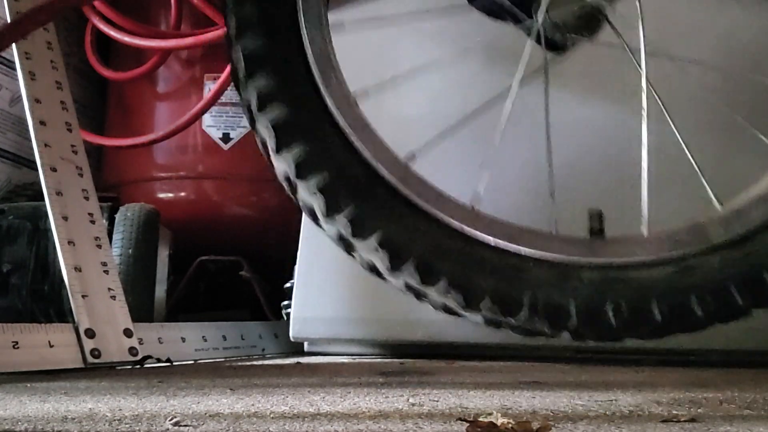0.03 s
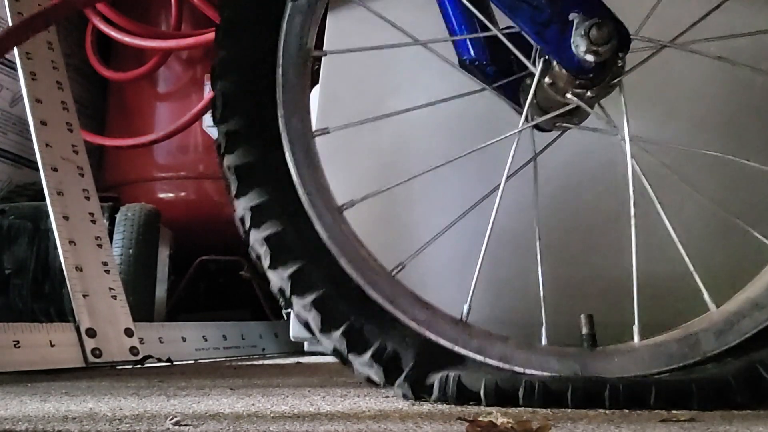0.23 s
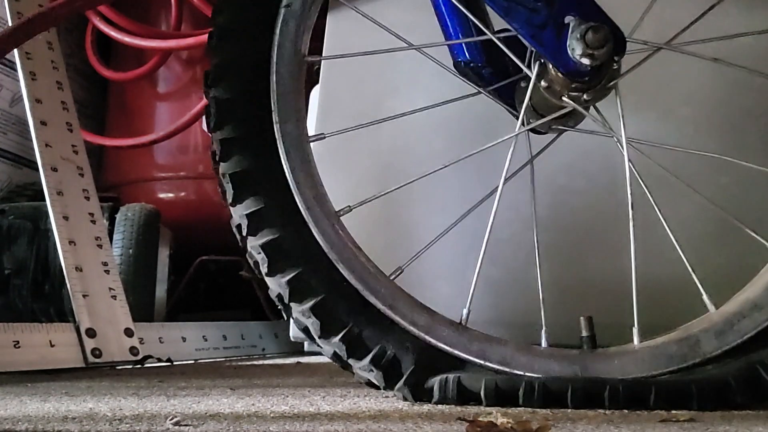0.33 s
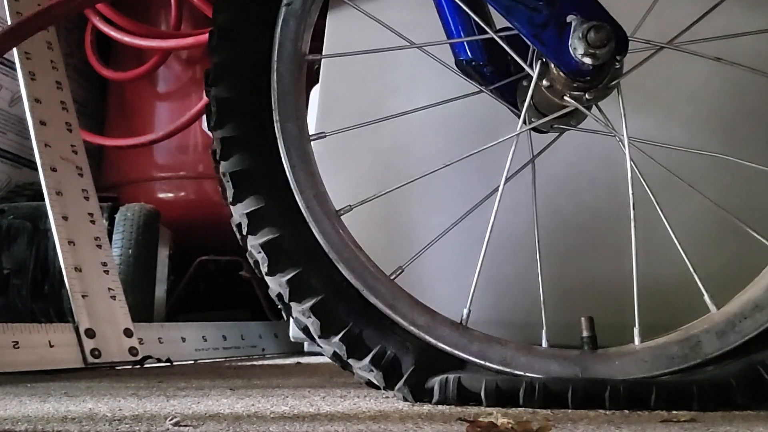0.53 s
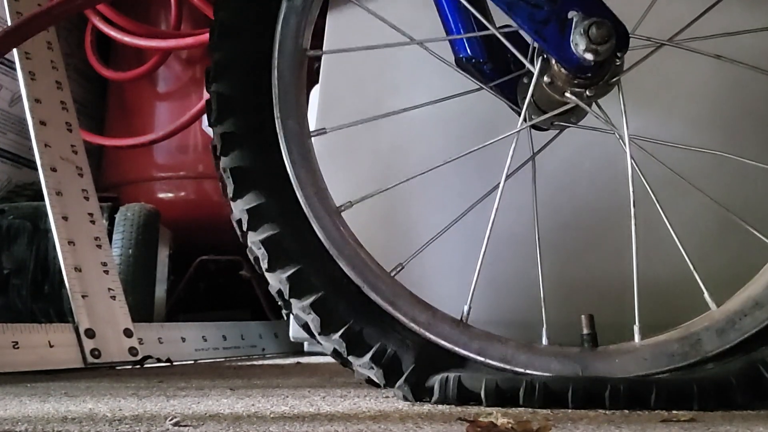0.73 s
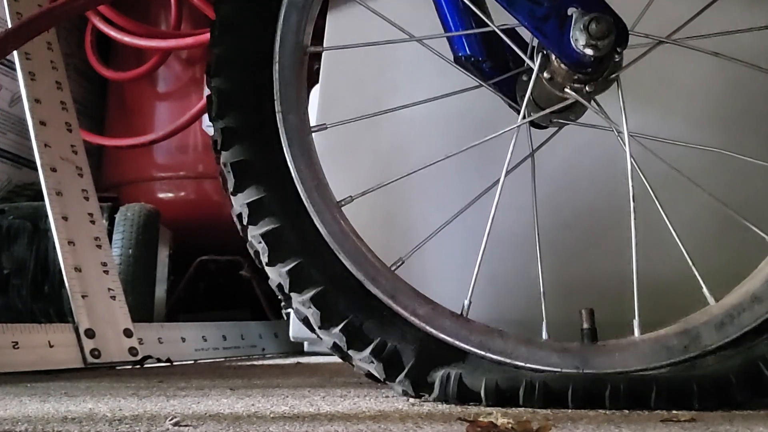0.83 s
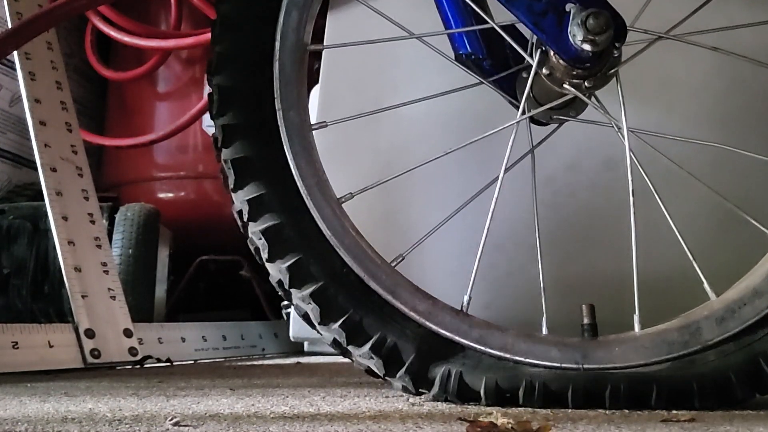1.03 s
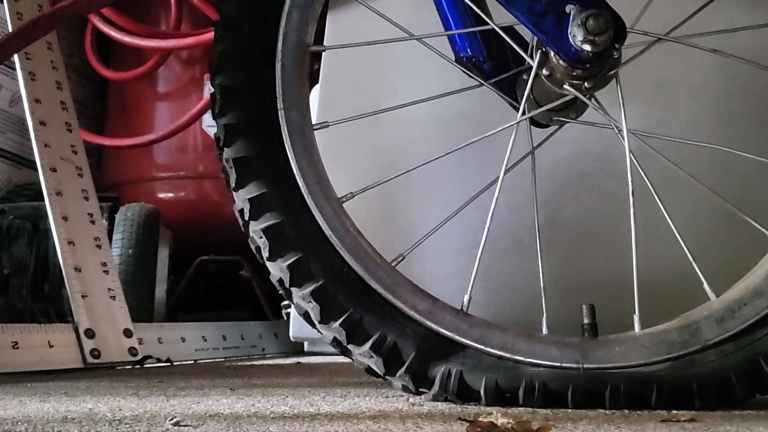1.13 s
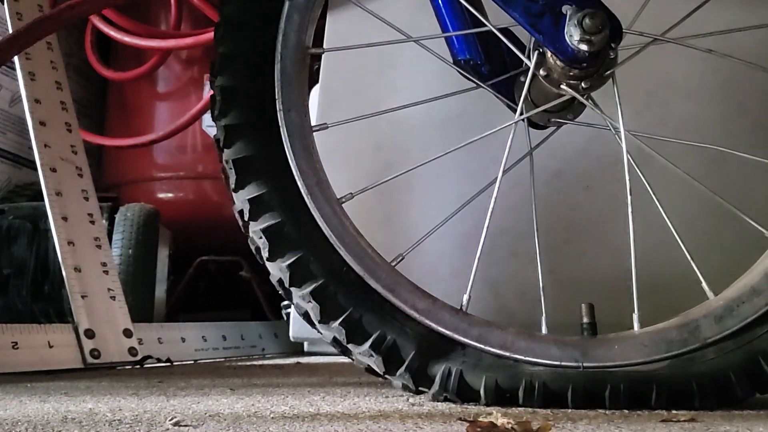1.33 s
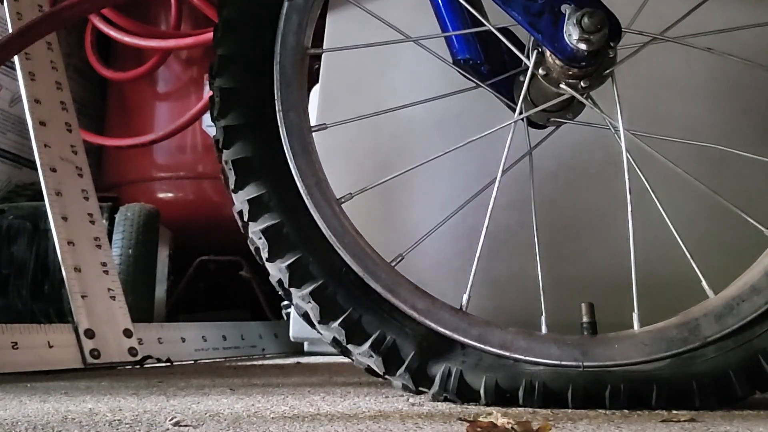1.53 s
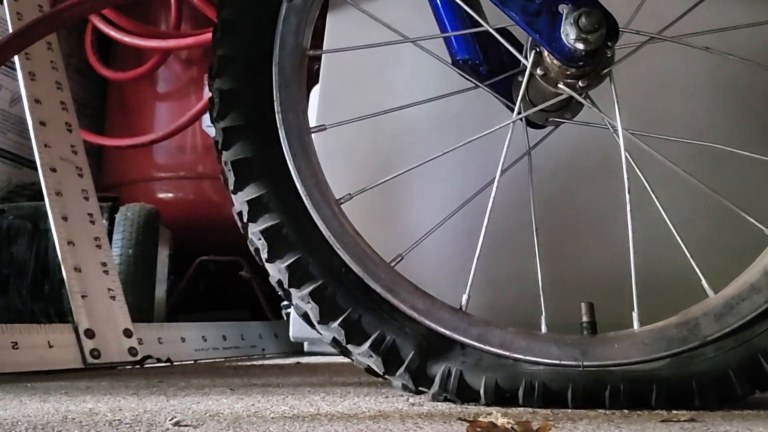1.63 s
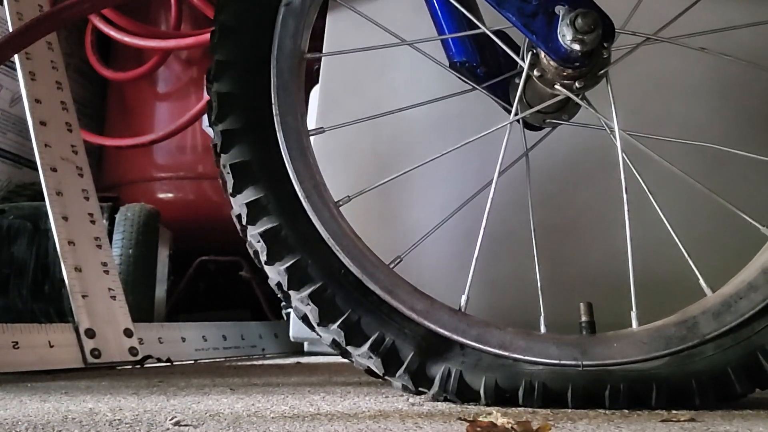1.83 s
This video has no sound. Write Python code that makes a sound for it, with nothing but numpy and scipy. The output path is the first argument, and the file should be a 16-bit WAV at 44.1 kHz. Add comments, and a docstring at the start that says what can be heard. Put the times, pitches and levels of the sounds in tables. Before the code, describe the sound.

A bicycle tyre thumps onto a concrete garage floor at about 0.2 seconds, close by, after a faint rustle. Grit crunches and the wheel rings and hums briefly, with a few small ticks. At 0.8 seconds the rubber sticks and slips in a short stuttering scuff, and near 1.7 seconds it slips again more softly. A low rumble and faint shrill insects outside run throughout.

```python
"""A concrete garage, the microphone near a bicycle; a low rumble and insects shrilling outside run throughout.
The bicycle rustles and ticks as it is lowered. At 0.22 s its knobbly tyre meets the floor: the tread
crushes grit, the air-filled casing thumps, the wheel rings, then hums as the tyre springs back.
At 0.82 s the rubber sticks and slips in a stuttering scuff as the wheel settles, and at 1.68 s it
slips once more. The cluttered room answers each sound of the bicycle briefly."""
import sys
import numpy as np
from scipy import signal
from scipy.fft import rfft, irfft, next_fast_len
from scipy.io import wavfile
from scipy.ndimage import map_coordinates

SR = 44100
rng = np.random.default_rng(int(sys.argv[2]) if len(sys.argv) > 2 else 0)


def pcm_store(signal):
    """Save signal as 16-bit PCM."""
    levels = np.round(np.clip(np.atleast_2d(signal), -1, 1) * 32767)
    wavfile.write(sys.argv[1], SR, levels.astype(np.int16).T)


N = 83790


def amp(db):
    """Decibels to gain."""
    return 10 ** (np.asarray(db) / 20)


def unit(x):
    """Scale to rms 1."""
    return x / np.sqrt(np.mean(x ** 2) + 1e-20)


def along(points, hz):
    """Read (frequency, value) points on a log frequency axis."""
    knots_hz, values = np.transpose(points)
    return np.interp(np.log(hz + 1), np.log(knots_hz + 1), values)


def since(start):
    """Seconds since start, for every sample."""
    return np.arange(N) / SR - start


def fade(start, t60):
    """A gain that jumps to 1 at start and falls 60 dB in t60 seconds."""
    return (since(start) >= 0) * amp(-60 * np.abs(since(start)) / t60)


def wobble(rate):
    """A smooth random curve, rate knots a second."""
    return map_coordinates(rng.standard_normal(N // 10), [np.arange(N) * rate / SR], mode="wrap")


def filtered(x, response):
    """Filter x by a function of frequency."""
    size = next_fast_len(N + SR // 2)
    return irfft(rfft(x, size) * response(np.fft.rfftfreq(size, 1 / SR)), size)[..., :N]


# Likeness of the microphone's two sides (frequency [Hz], correlation [0-1])
LIKENESS = [(50, 1), (500, 0.78), (1200, 0.26), (2500, 0.071), (6000, 0.067), (15000, 0.079)]
def spread(pair, spectrum):
    """Turn two unrelated signals into coloured stereo of rms 1, alike in the bass."""
    def mid_side_gains(hz):
        angle = np.arccos(np.clip(along(LIKENESS, hz), -.99, .99)) / 2
        return amp(along(spectrum, hz)) * [np.cos(angle), np.sin(angle)]
    mid, side = filtered(pair, mid_side_gains)
    return unit(np.array([mid + side, mid - side]))


def noise(spectrum):
    """Coloured stereo noise of rms 1."""
    return spread(rng.standard_normal((2, N)), spectrum)


def grains(spectrum, per_s=9000, scatter_db=3):
    """Dense tiny clicks of uneven size, stereo, rms 1."""
    sizes = rng.standard_normal((2, N)) * amp(scatter_db * rng.standard_normal((2, N)))
    return spread((rng.random((2, N)) < per_s / SR) * sizes, spectrum)


def strokes(rows):
    """The envelope of strokes that rise, hold and release."""
    envelope = np.zeros(N)
    for start, rise, hold, t60, db in rows:
        let_go = start + rise + hold
        release = np.where(since(let_go) < 0, 1, fade(let_go, t60))
        envelope += amp(db) * np.clip(since(start) / rise, 0, 1) * release
    return envelope


def ring(start, modes, attack_s=.001):
    """Damped modes swell from start and sound for up to half a second."""
    age = since(start)
    live = (age > 0) & (age < .5)
    t = age[live, None]
    hz, db, t60 = np.transpose(modes)
    partials = amp(db - 60 * t / t60) * np.sin(2 * np.pi * hz * t)
    ringing = np.zeros(N)
    ringing[live] = np.sum(partials * (1 - np.exp(-t / attack_s)), axis=1)
    return ringing


def snap(centre, hz, width_s):
    """A dead rubber contact: little more than one cycle."""
    t = since(centre)
    return np.cos(2 * np.pi * hz * t) * np.exp(-.5 * (t / width_s) ** 2)


# Rumble all around the microphone (frequency [Hz], level [dB])
RUMBLE_SPECTRUM = [(22, -10), (40, -5), (55, -7), (80, -4), (120, 0), (170, -8), (230, -13.5), (310, -20.5),
                   (410, -17.5), (480, -23.5), (600, -21), (800, -28), (1300, -34), (2700, -49.5),
                   (4200, -52)]
def background():
    """A low steady rumble and a faint hiss fill the garage."""
    rumble = noise(RUMBLE_SPECTRUM + [(9000, -66)])
    hiss = noise([(9000, -17), (11500, 6), (15000, -1)])
    return amp(-51) * rumble + amp(-89.5) * hiss


# Insects outside: the chorus and single voices (frequency [Hz], level [dB])
CHORUS_SPECTRUM = [(3800, -29.5), (4650, -18), (4950, -3), (5900, -5.5), (6500, 1.5), (7100, 3),
                   (7450, -17.5), (8000, -25), (8800, -44.5)]
TRILLS = [(5100, -77), (5470, -77.5), (6075, -74), (7070, -74)]
def insects(chirps_per_s=10.8):
    """A far chorus, louder on the right, with a few steady trills and one pulsing chirp."""
    def voice(hz, width_hz):
        carrier = np.exp(2j * np.pi * hz * since(0))
        flutter = np.array([wobble(width_hz) + 1j * wobble(width_hz) for _ in range(2)])
        return unit(np.real(flutter * carrier))
    chorus = amp(-66 + 0.98 * wobble(40.1)) * noise(CHORUS_SPECTRUM)
    trills = sum(amp(db) * voice(hz, width_hz=50) for hz, db in TRILLS)
    pulse = (.5 + .5 * np.cos(2 * np.pi * chirps_per_s * since(1.05))) ** 2
    chirp = amp(-67) * pulse * voice(5600, width_hz=160)
    return (chorus + trills + chirp) * amp([[-1.5], [1.5]])


# Course of the faint rustle (time [s], level [dB])
RUSTLE_LEVELS = [(0, -64), (.15, -64), (.33, -61), (.53, -64.5), (.6, -81), (.75, -72), (.95, -65.5),
                 (1.1, -71), (1.18, -75), (1.35, -70.5), (1.5, -64), (1.62, -81.5), (1.9, -90)]
# Dull rubs (start [s], rise [s], hold [s], release t60 [s], level [dB])
RUBS = [(.017, .006, 0.0058, 0.02, -56.5), (.083, 0.0041, 0.0035, 0.2, -58), (.215, 0.01, .001, 0.05, -46),
        (.428, 0.023, .003, 0.11, -51), (1.33, 0.0086, 0.0056, 0.2, -67), (1.478, 0.011, .003, 0.04, -60)]
# Colours of rustle and rub (frequency [Hz], level [dB])
RUSTLE_SPECTRUM = [(150, 5), (500, 5), (1200, -3.5), (2200, -10.5), (3200, -6.5), (5000, -16.5),
                   (9000, -31), (12000, -21), (15000, -25)]
RUB_SPECTRUM = [(200, -8), (600, 2.5), (1300, -0.5), (1800, -1), (2200, -10.5), (3000, -1.5), (3600, -9),
                (4700, -7), (7000, -20), (9000, -30), (15000, -22)]
def handling():
    """Near the microphone the bicycle rustles and rubs as it is lowered and steadied."""
    rustle_db = np.interp(since(0), *np.transpose(RUSTLE_LEVELS)) + 2.5 * wobble(34.8)
    rustle = amp(rustle_db) * grains(RUSTLE_SPECTRUM)
    return rustle + strokes(RUBS) * grains(RUB_SPECTRUM)


# Ticks of the bicycle (time [s], level [dB])
TICKS = [(.044, -82), (.408, -62), (.524, -51), (0.777, -64), (0.809, -62), (1.6795, -51.5)]
# Their colour (frequency [Hz], level [dB])
TICK_SPECTRUM = [(500, -15), (3000, -4.5), (8000, -2), (15000, -11)]
def ticks():
    """The bicycle gives small dry ticks, each a burst of bright noise."""
    return sum(amp(db) * fade(start, t60=0.017) for start, db in TICKS) * noise(TICK_SPECTRUM)


# Tread bearing on the floor (start [s], rise [s], hold [s], release t60 [s], level [dB])
CRUNCHES = [(.225, .008, 0.048, 0.1668, -41), (.335, 0.014, 0.01, 0.22, -55.5),
            (.818, 0.048, 0.026, 0.1647, -45.5)]
# Breaking grit (frequency [Hz], level [dB])
GRIT_SPECTRUM = [(200, -18), (600, 3.5), (1400, -1), (2100, -8.5), (3000, -3), (3800, -7.5), (7500, -8.5),
                 (9300, -25.5), (11500, -19), (15000, -21)]
def grit():
    """Grit breaks on the concrete while the tread presses or drags."""
    return strokes(CRUNCHES) * grains(GRIT_SPECTRUM)


# Tyre meeting concrete (time [s], thud [dB], wheel ring [dB], knock [dB], crack [dB])
CONTACTS = [(.2269, -39.5, -27, -32, -34), (.2337, -39, -28.5, -11.5, -27),
            (0.2443, -29.5, -36.5, -43, -36), (.2509, -28.5, -37, -41, -44), (0.265, -28.5, -57, -44, -57),
            (0.2718, -36, -41.5, -30.5, -33.5), (.2812, -48, -48, -50, -52), (0.293, -60, -64, -55, -40.5),
            (.3205, -46, -53, -60, -54)]
# Modes of the air-filled casing and the wheel (frequency [Hz], level [dB], t60 [s])
CASING_MODES = [(78.3, -3, 0.21), (110, -1, 0.093), (164.8, 6.5, 0.074), (214.4, 4, 0.063),
                (290.5, -11.5, .1)]
WHEEL_MODES = [(388, 3.5, 0.23), (430.3, 0, .11), (544, 6.5, 0.08), (591.6, 2, 0.096), (643.6, 1.5, 0.099),
               (682.4, 0.5, 0.2), (974, -11, 0.11), (1060, -6, 0.11), (1227, -15, 0.2), (1345, -19, 0.21),
               (1720, -28, 0.31), (2066, -22, 0.16), (2540, -23, 0.19), (3107, -22, 0.31)]
# Crack of a contact (frequency [Hz], level [dB])
CRACK_SPECTRUM = [(300, -18), (1300, 1.5), (1750, -1), (2200, 2), (3100, -2), (4000, -11.5), (7500, -16.5),
                  (10000, -28), (16000, -28)]
def landing(knock_hz=926, knock_width_s=0.00043):
    """Each contact with the floor thumps the casing, rings the wheel, knocks and cracks."""
    body, crack_envelope = np.zeros(N), np.zeros(N)
    for start, thud_db, ring_db, knock_db, crack_db in CONTACTS:
        body += amp(thud_db) * ring(start, CASING_MODES, attack_s=0.0014)
        body += amp(ring_db) * ring(start, WHEEL_MODES)
        body += amp(knock_db) * snap(start + knock_width_s, knock_hz, knock_width_s)
        crack_envelope += amp(crack_db) * fade(start, t60=0.025)
    return body + crack_envelope * noise(CRACK_SPECTRUM)


# Hum of the wheel (frequency [Hz], level [dB], t60 [s])
REBOUND_MODES = [(624, 0.5, 0.076), (1220, -7, 0.077), (1867, -13.5, 0.074), (3040, -15.5, 0.087)]
def rebound():
    """The wheel hums briefly as the tyre springs back."""
    return amp(-34) * ring(.349, REBOUND_MODES, attack_s=0.017)


# Rubber letting go of the floor (time [s], snap [dB], snap pitch [Hz], tread ring [dB], rasp [dB])
SLIPS = [(.8248, -52, 2580, -58, -48.5), (.8357, -49, 2550, -58, -47), (.8462, -40, 1680, -56, -43),
         (.8548, -36.5, 1310, -55, -55), (.8636, -31, 1140, -45, -44), (.8719, -32, 1150, -52, -43.5),
         (.8799, -29, 990, -33.5, -49), (.8880, -27.5, 930, -40, -40.5), (.8973, -28, 970, -49.5, -40),
         (.9098, -27, 900, -36.5, -43), (1.680, -34.5, 1130, -46, -48.5), (1.6935, -42, 1110, -50, -53),
         (1.7075, -44, 1010, -60, -57)]
# Modes of the tread (frequency [Hz], level [dB], t60 [s])
TREAD_MODES = [(628, 1, 0.043), (692, -10, 0.028), (1070, -10, 0.044), (1320, -14, 0.028), (1573, -9, 0.06)]
# Rubber rasping on concrete (frequency [Hz], level [dB])
RASP_SPECTRUM = [(400, -19), (1500, -2), (2200, -7), (3000, 0.5), (3800, -5), (4600, 2.5), (6000, -4),
                 (7300, 0), (9500, -23.5), (15000, -23)]
def scuff(snap_width_s=0.00051):
    """The tread sticks and slips; each release snaps, rings the rubber and rasps."""
    body, rasp_envelope = np.zeros(N), np.zeros(N)
    for time, snap_db, snap_hz, ring_db, rasp_db in SLIPS:
        body += amp(snap_db) * snap(time, snap_hz, snap_width_s)
        body += amp(ring_db) * ring(time + 2 * snap_width_s, TREAD_MODES)
        rasp_envelope += amp(rasp_db) * fade(time - snap_width_s, t60=0.019)
    return body + rasp_envelope * noise(RASP_SPECTRUM)


# The wheel as heard at the microphone (frequency [Hz], left minus right [dB])
BALANCE = [(200, 0), (400, 0.5), (650, -6), (1200, -2), (4400, -.5), (8000, -5), (14000, -1)]
# Phase between the two sides (frequency [Hz], lead of the left [rad])
LEFT_LEAD = [(30, -.1), (100, -0.13), (400, -0.42), (700, -0.45), (1500, -0.14), (4000, 0.16)]
def placement(hz):
    """The stereo response that stands the wheel a little right of the microphone."""
    sides = np.array([[.5], [-.5]])
    return amp(along(BALANCE, hz) * sides) * np.exp(1j * along(LEFT_LEAD, hz) * sides)


# Decay of the garage (frequency [Hz], t60 [s])
GARAGE_DECAY = [(100, 0.17), (600, 0.28), (3000, 0.33), (12000, 0.38)]
def garage(direct):
    """Near clutter reflects the sound at once; a weak tail follows."""
    length = SR // 2
    wash = noise([(60, -17), (500, -1.5), (15000, 2)])[:, :length]
    hz, t, bands = signal.stft(wash, SR, nperseg=256)
    decay = amp(-60 * t / along(GARAGE_DECAY, hz)[:, None])
    tail = signal.istft(bands * decay, SR, nperseg=256)[1][:, :length]
    scatter = noise([(200, -9.5), (700, 0), (1500, -1), (15000, -1.5)])
    early = (scatter * fade(.002, t60=0.043))[:, :length]
    response = amp(-9.5) * early / np.linalg.norm(early[0]) + amp(-18.5) * tail / np.linalg.norm(tail[0])
    return signal.fftconvolve(direct, response, axes=1)[:, :N]


def scene():
    """The bicycle close by, the garage around it, the insects far outside."""
    bicycle = landing() + grit() + scuff() + ticks() + handling() + rebound()
    direct = filtered(bicycle, placement)
    return direct + garage(direct) + insects() + background()


def record(dry, top_hz=15850):
    """Nothing is kept above the band limit."""
    return filtered(dry, lambda hz: hz < top_hz)


dry = scene()
out = record(dry)
pcm_store(out)
```